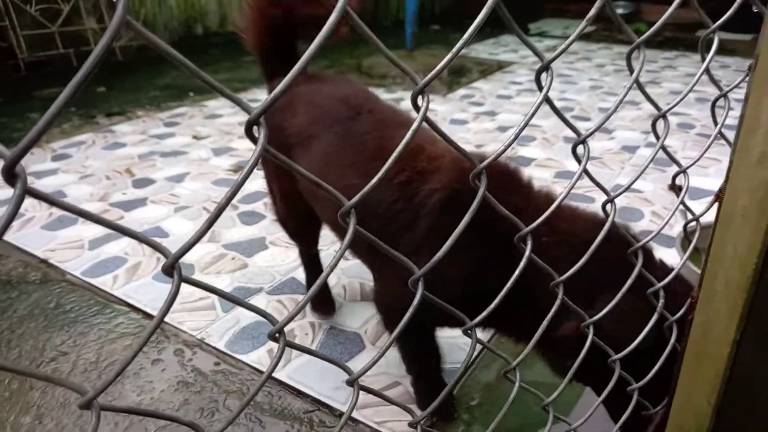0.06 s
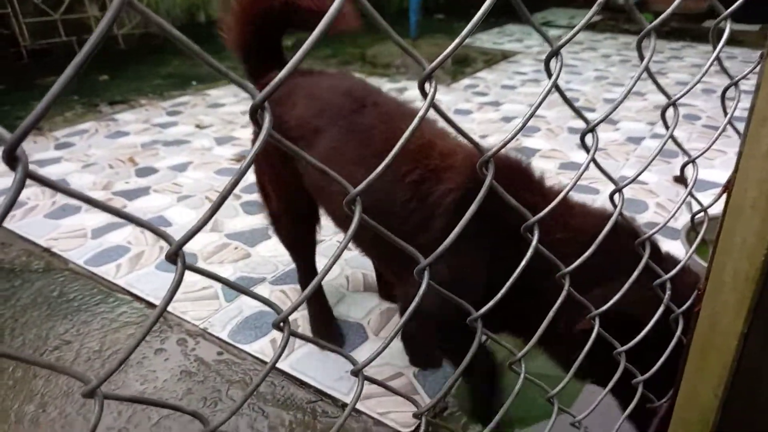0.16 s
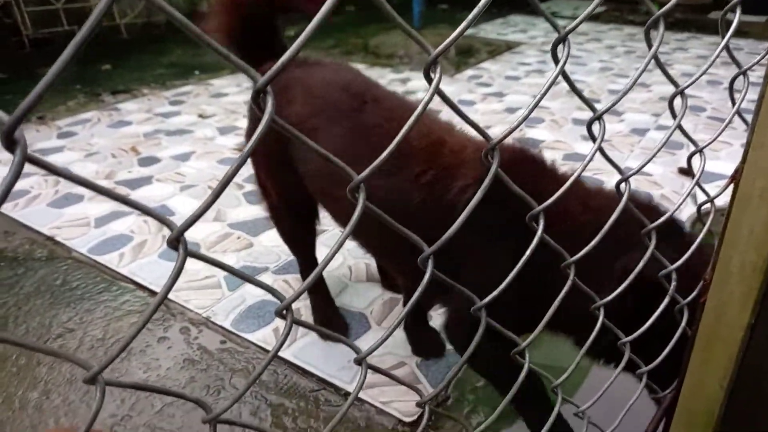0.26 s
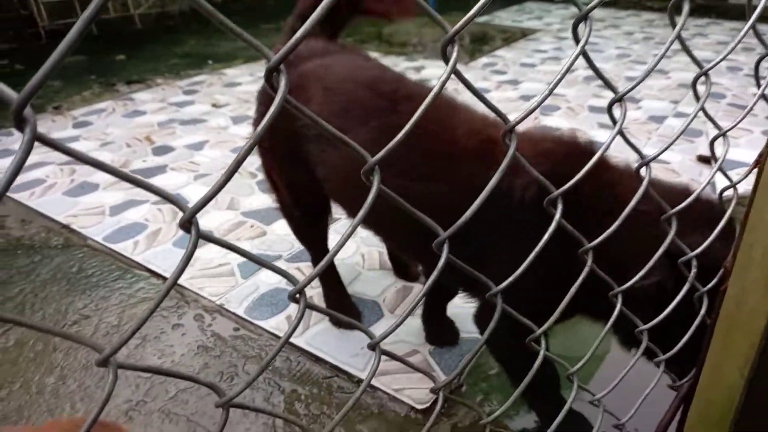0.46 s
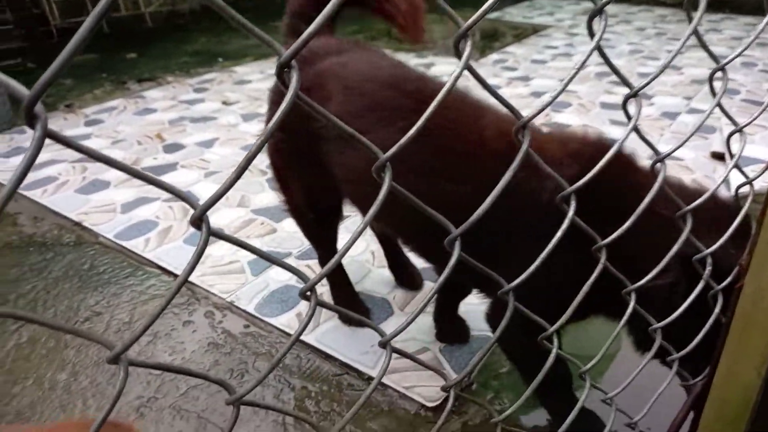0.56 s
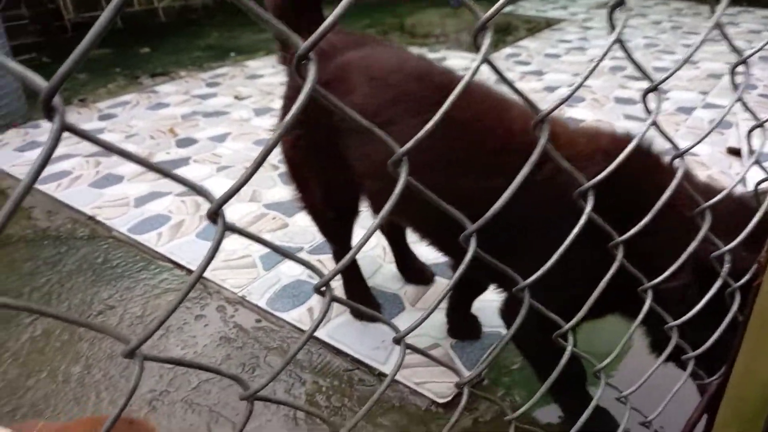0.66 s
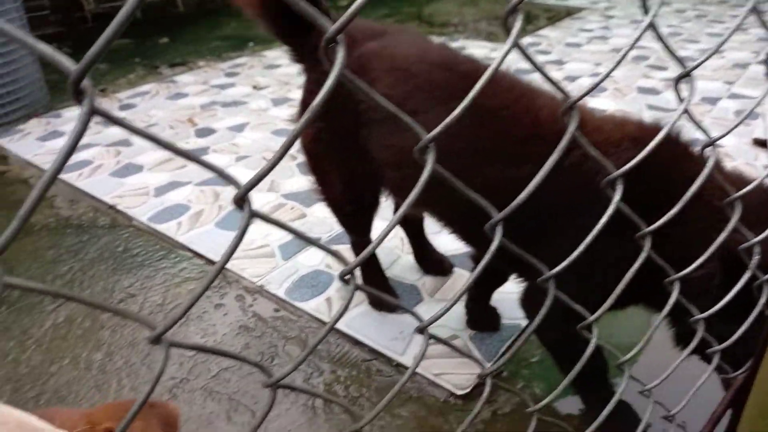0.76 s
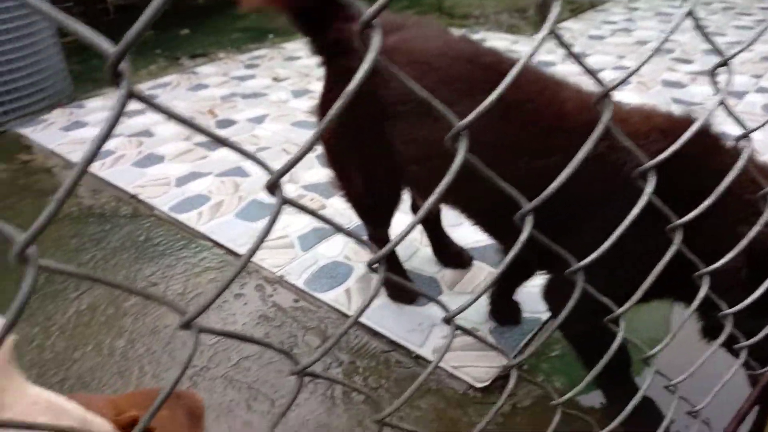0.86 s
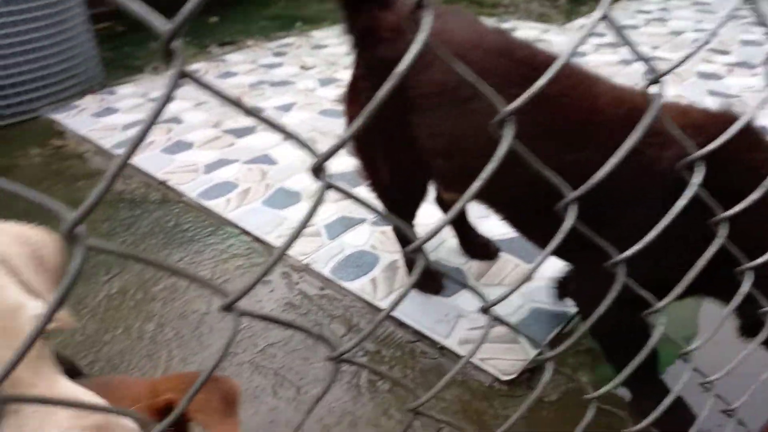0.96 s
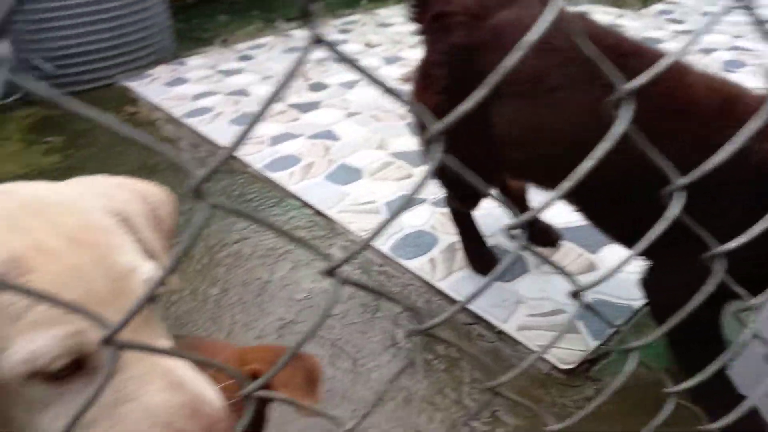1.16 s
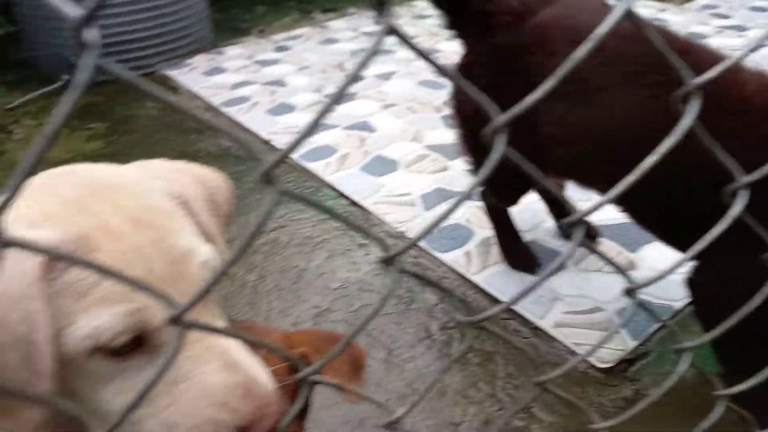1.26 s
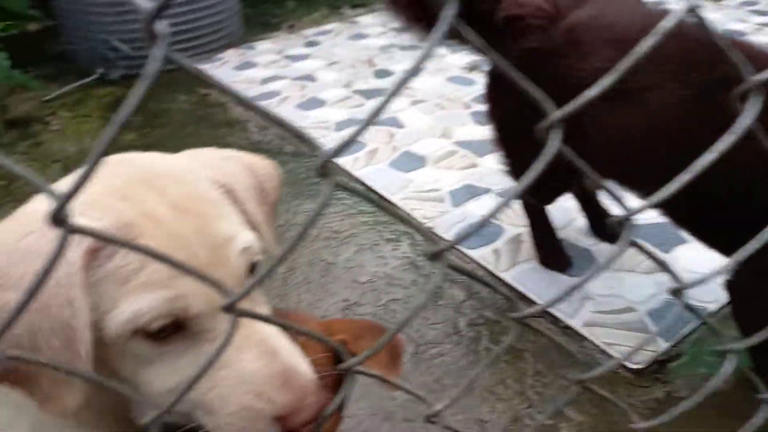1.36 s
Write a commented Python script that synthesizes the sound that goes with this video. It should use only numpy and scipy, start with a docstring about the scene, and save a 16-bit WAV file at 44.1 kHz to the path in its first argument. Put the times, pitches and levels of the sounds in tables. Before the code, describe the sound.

Dogs yelp, whine and give one hoarse bark in an echoing pen.

```python
"""Excited dogs in a hard-walled pen; each call is vocal-fold pulses and breath shaped by a throat.
A distant yelp dies away under a thin nasal whistle. At 0.2 s one dog yelps close by; a second answers
from farther back, ringing in the pen. Near 0.8 s a hoarse bark follows and sinks into a low groan.
More whines, soft grunts, thuds and scuffs come in between, over a faint rumble and outdoor air."""
import sys
import numpy as np
from scipy import signal
from scipy.fft import rfft, irfft, next_fast_len
from scipy.io import wavfile
from scipy.ndimage import uniform_filter1d, map_coordinates

SR = 44100
rng = np.random.default_rng(int(sys.argv[2]) if len(sys.argv) > 2 else 0)


def master_out(mix):
    """Clip the mix to full scale and print it as 16-bit PCM to the path in sys.argv[1]."""
    frames = np.transpose(np.atleast_2d(mix))
    ceiling = np.clip(frames, -1, 1)
    pcm = np.round(ceiling * 32767).astype(np.int16)
    wavfile.write(sys.argv[1], SR, pcm)


N = 61739
LEAD = SR // 5  # samples before time zero
T = np.arange(-LEAD, N) / SR
N_FFT = next_fast_len(len(T) + SR // 2, real=True)
HZ = np.fft.rfftfreq(N_FFT, 1 / SR)
TOP_HZ = 15800

# Near yelp. Each row: time in seconds, pitch in Hz, body level in dB, treble level in dB.
NEAR_YELP = [(.207, 402.4, -18.5, -30), (.212, 417, -17.5, -22), (.221, 452.3, -14.5, -17),
             (.231, 494, -14.5, -16), (.241, 522.7, -15.5, -10), (.252, 541.8, -17.5, -14.5),
             (.265, 541.7, -17, -15.5), (.275, 535.4, -17, -16), (.281, 530, -26, -29),
             (.291, 486, -27.5, -50)]
# Its direction. Each row: frequency in Hz, lag of left behind right in radians.
NEAR_LAG_RAD = [(20, 0), (300, .5), (550, .9), (1100, 1.55), (1650, 1.7), (2700, 1.7), (3300, 2.2),
                (3800, 4), (5000, 5.3), (8000, 10), (15000, 22)]
# Each row: frequency in Hz, leftward pan in dB.
NEAR_PAN_DB = [(300, -1.8), (1000, -1.3), (2800, -1.1), (4000, .3), (8000, .5)]
# Far calls. Each row: time in seconds, pitch in Hz, source level in dB, roughness from 0 to 1.
OPENING_CALL = [(-.12, 586, -21, 0.74), (-.04, 611, -41, 0.65), (.01, 606, -52.5, 0.77),
                (.06, 605, -49.5, 1), (.08, 570, -53.5, 0.36)]
ANSWER_CALL = [(.288, 486, -30.5, 0.69), (.315, 566.5, -28.5, 0.74), (.338, 610.3, -22, 0.44),
               (.35, 615.2, -25.5, 0.24), (.372, 630.7, -21, 0.17), (.381, 624.6, -35, 0.36),
               (.399, 637.2, -24.5, 0.26), (.409, 621, -36.5, 1), (.43, 619.3, -25, 0.97)]
BARK_CALL = [(.764, 261.9, -50, 1), (.789, 272.8, -28.5, 0.47), (.81, 290.8, -26.5, 0.43),
             (.824, 301.4, -28.5, 0.2), (.836, 311.2, -20.5, 0.45), (.85, 303.3, -32, 0.5),
             (.872, 265, -39.5, 0.13), (.93, 228.2, -51, 0.72), (.98, 207, -66, 0.24)]
GROAN_CALL = [(.835, 236.2, -52.5, 0.35), (.86, 234.6, -37.5, 0.092), (.895, 222.9, -36, 0.2),
              (.925, 223.7, -36, 0.45), (.97, 200.8, -44.5, .35), (1.04, 180.1, -52, 0.56),
              (1.12, 182.7, -51.5, .4), (1.155, 169.6, -72, 0.34), (1.19, 175.4, -63.5, 0.3),
              (1.22, 165, -72.5, 0.67), (1.27, 163, -79.5, 0.49)]
# Throat resonances. Each row: frequency in Hz, relative gain in dB.
NEAR_THROAT_DB = [(60, -59.5), (200, -45.5), (400, -11.5), (560, -21), (800, -5), (1090, -4), (1300, 8.5),
                  (1650, -7.5), (2150, -6), (2700, 1.5), (3250, -4.5), (3800, -1.5), (4400, -20.5),
                  (4900, -27.5), (5400, -33), (6100, -34.5), (7400, -20.5), (8500, -48), (11000, -37.5),
                  (15000, -51)]
OPENING_THROAT_DB = [(250, -26.5), (480, -10.5), (615, -1.5), (740, -10.5), (950, 5), (1230, -7.5),
                     (1500, 0), (1860, 0), (2300, -7), (3000, -15.5), (3500, -14), (4000, -23.5),
                     (4400, -21), (4900, -22.5), (7000, -27), (8500, -43.5), (15000, -46.5)]
ANSWER_THROAT_DB = [(250, -32), (480, -4.5), (630, -9.5), (850, -5.5), (1150, 2.5), (1500, -13),
                    (1880, 5.5), (2300, -7.5), (3000, -12.5), (3800, -19.5), (4400, -27), (7000, -30),
                    (8500, -36.5), (11500, -33.5), (15000, -51)]
BARK_THROAT_DB = [(60, -47), (150, -39), (300, -32), (420, -18), (520, -7.5), (690, 4), (780, 4), (900, 2),
                  (1020, 7.5), (1170, 2), (1470, -1.5), (1680, 0.5), (1870, 6.5), (2220, -6.5), (2600, -4),
                  (3000, -12.5), (3800, -19), (4600, -36), (7000, -34.5), (8500, -42), (11500, -36.5),
                  (15000, -53.5)]
GROAN_THROAT_DB = [(80, -30), (180, -12), (250, -18.5), (370, 8), (460, 0), (690, 10.5), (900, -1),
                   (1300, -4.5), (2000, -20), (2800, -12), (4000, -34), (7000, -25), (14000, -40.5)]
GRUNT_THROAT_DB = [(80, -9), (170, -1.5), (260, -15.5), (370, -5.5), (700, -21), (3000, -50.5)]
# Whines, one list each. Each row: time in seconds, pitch in Hz, source level in dB.
WHINE_CALLS = [
    [(-.02, 6310, -63), (.02, 6192, -45.5), (.07, 6196, -47.5), (.115, 6210, -47), (.145, 6190, -53),
     (.17, 6185, -44), (.21, 6140, -52), (.24, 6190, -45)],
    [(.045, 5270, -62), (.06, 5250, -61), (.075, 5200, -74)],
    [(.648, 6620, -86), (.67, 6650, -51.5), (.695, 6630, -51.5), (.712, 6270, -57), (.73, 5720, -59),
     (.745, 5810, -61)],
    [(1.04, 6750, -71), (1.06, 6483, -60.5), (1.08, 6080, -74), (1.125, 5575, -67), (1.145, 5340, -89)],
]
# One row per whine: pitch waver as a fraction, reverb gain in dB (capped in whine).
WHINE_WAVER_WET = [(.0012, -9), (.008, -6), (.008, 2), (.009, -3)]
# Grunts. Each row: centre in seconds, pitch in Hz, peak source level in dB.
GRUNT_EVENTS = [(0.412, 171.9, -44.5), (1.045, 180.2, -52), (1.118, 171.1, -53.5), (1.184, 167.3, -53.5)]
# Pen reverberation. Each row: frequency in Hz, time to decay 60 dB in seconds.
PEN_T60_S = [(100, .5), (500, 0.66), (1400, 0.72), (1900, 0.71), (2300, .75), (2700, 0.75), (4000, 0.7),
             (8000, 0.7), (14000, .4)]
# Thuds. Each row: centre in seconds, frequency in Hz, peak level in dB.
THUD_EVENTS = [(0.156, 69.05, -51.5), (1.126, 82.9, -53)]
# Scuffs. Each row: centre in seconds, peak level in dB.
SCUFF_EVENTS = [(0.589, -70.5), (1.235, -66)]
# Noise spectra. Each row: frequency in Hz, relative gain in dB.
SCUFF_SPECTRUM_DB = [(500, -20), (2500, -7), (6500, -1), (9000, -8), (14000, -19)]
RUMBLE_SPECTRUM_DB = [(20, -21.5), (40, -23), (65, -6.5), (90, -2), (130, -5.5), (250, -14), (600, -18),
                      (2000, -49)]
AIR_SPECTRUM_DB = [(100, -30), (500, -6.5), (1500, 8), (3000, -11), (6500, -4.5), (8500, -15.5),
                   (15000, -28.5)]
# Background. Each row: time in seconds, rumble level in dB, air level in dB.
BACKGROUND_DB = [(0, -57.5, -92), (.15, -64.5, -53), (.3, -56, -69), (.7, -62, -58), (.95, -62.5, -51),
                 (1.2, -56.5, -66.5), (1.28, -69.5, -69), (1.4, -72.5, -88)]


def near_yelp(rough, onset_rough, jitter, wet_db, treble_hz=2052, spread_s=.00078, wall_s=.025):
    """Yelp from the right: starts hoarse, clears, arches in pitch, brightens as the mouth opens."""
    gate, pitch_hz, body_db, treble_db = curves(NEAR_YELP)
    hoarse = np.interp(T, [.23, .245], [onset_rough, rough])
    source = vocal_folds(pitch_hz, hoarse, jitter, hiss_hz=8500) + rasp()
    voice = throat(source, NEAR_THROAT_DB)
    body = filtered(voice, 1 / (1 + (HZ / treble_hz) ** 12))
    yelp = gate * (amp(body_db) * levelled(body) + amp(treble_db) * levelled(voice - body))
    # each pulse's treble trails its bass
    yelp = filtered(yelp, np.exp(-1j * np.pi * HZ * spread_s * np.minimum(HZ / treble_hz, 2)))
    direct = place(yelp, along(NEAR_LAG_RAD, HZ), along(NEAR_PAN_DB, HZ))
    delayed = filtered(yelp, np.exp(-2j * np.pi * HZ * wall_s))
    return direct + amp(wet_db) * pen(delayed, pan_db=.5)


def rasp(corner_hz=6000, gain=3.1):
    """Treble turbulence, strongest while the mouth opens."""
    hiss = filtered(rng.standard_normal(len(T)), 1 - 1 / (1 + (HZ / corner_hz) ** 2))
    return gain * np.interp(T, [.228, .25], [1, .2]) * hiss


def vocal_folds(pitch_hz, rough, jitter, hiss_hz):
    """Unsteady pulses plus turbulence let through once a cycle, which takes over above hiss_hz."""
    hz = pitch_hz * (1 + jitter * wobble(220))
    phase = 2 * np.pi * np.cumsum(hz) / SR
    harmonics = np.arange(TOP_HZ // np.min(pitch_hz) + 1)
    pulses = unit(sum(np.cos(k * phase) * (k * hz < TOP_HZ) for k in harmonics))
    puffs = unit(rng.standard_normal(len(T)) * (.72 + np.cos(phase)))
    lowpass = 1 / np.sqrt(1 + (HZ / hiss_hz) ** 4)
    clear = filtered(pulses, lowpass) + filtered(puffs, 1 - lowpass)
    return np.sqrt(1 - rough) * clear + np.sqrt(rough) * puffs


def throat(source, throat_db):
    """Throat resonances as a minimum-phase filter."""
    cepstrum = irfft(np.log(amp(along(throat_db, HZ))), N_FFT)
    cepstrum[1:N_FFT // 2] *= 2
    cepstrum[N_FFT // 2 + 1:] = 0
    return filtered(source, np.exp(rfft(cepstrum, N_FFT)))


def far_call(rows, throat_db, jitter, direct_db, wet_db, pan_db):
    """Call from the back of the pen, heard directly and off the walls."""
    gate, pitch_hz, level_db, rough = curves(rows)
    source = vocal_folds(pitch_hz, rough, jitter, hiss_hz=3830)
    call = gate * amp(level_db) * unit(throat(source, throat_db))
    return amp(direct_db) * place(call, 0, pan_db) + amp(wet_db) * pen(call, pan_db)


def whine(rows, waver, wet_db):
    """Nearly pure whistle through the nose."""
    gate, pitch_hz, level_db = curves(rows)
    envelope = gate * amp(level_db + .4 * wobble(66))
    hz = pitch_hz * (1 + waver * wobble(140))
    whistle = envelope * np.sqrt(2) * np.sin(2 * np.pi * np.cumsum(hz) / SR)
    return place(whistle, 0, pan_db=1.5) + amp(min(wet_db, -3)) * pen(whistle, pan_db=2)


def grunts(rough, half_s=.024, sag=.057, fade_db=17):
    """Short, soft calls that sink in pitch."""
    mix = 0
    for centre_s, hz, db in GRUNT_EVENTS:
        rows = [(centre_s + k * half_s, hz * (1 - k * sag), db - abs(k) * fade_db, rough)
                for k in (-1, 0, 1)]
        mix += far_call(rows, GRUNT_THROAT_DB, jitter=.013, direct_db=4, wet_db=-14.5, pan_db=-1)
    return mix


def pen(x, pan_db):
    """Hard-wall reverberation: strong early reflections, then a decaying tail, different per side."""
    hz, t, noise = signal.stft(rng.standard_normal((2, SR)), SR, nperseg=256)
    decay = amp(-60 * t / along(PEN_T60_S, hz)[:, None])
    early = 1 + 2.9 * np.exp(-t / .045)
    tail = signal.istft(noise * early * decay, SR, nperseg=256)[1]
    tail = np.pad(tail / np.linalg.norm(tail[0]), ((0, 0), (SR // 250, 0)))  # 4 ms pre-delay
    return signal.fftconvolve(x[None], tail, axes=1)[:, :len(T)] * amp([[pan_db], [-pan_db]])


def thuds(half_s=.025):
    """Dull low swells, centred."""
    return sum(amp(db) * np.exp(-((T - s) / half_s) ** 2) * np.sin(2 * np.pi * hz * (T - s))
               for s, hz, db in THUD_EVENTS)


def scuffs(half_s=.03):
    """Faint swells of gritty hiss, like paws on paving."""
    envelope = sum(amp(db) * np.exp(-((T - s) / half_s) ** 2) for s, db in SCUFF_EVENTS)
    grit = rng.standard_normal((2, len(T))) * amp(2 * wobble(300))
    return envelope * coloured(grit, SCUFF_SPECTRUM_DB)


def background():
    """Low rumble, mostly common to both sides, and a thin wash of outdoor air."""
    _, rumble_db, air_db = curves(BACKGROUND_DB)
    common = rng.standard_normal(len(T))
    rumble = coloured(common + .51 * rng.standard_normal((2, len(T))), RUMBLE_SPECTRUM_DB)
    air = coloured(rng.standard_normal((2, len(T))), AIR_SPECTRUM_DB)
    rumble *= amp(rumble_db + 4.7 * wobble(16)) * amp([[-1], [1]])
    return rumble + amp(air_db + 1.3 * wobble(27)) * air


def place(x, lag_rad, pan_db):
    """Direct sound in stereo: left lags by lag_rad; pan_db is added left, taken off right."""
    side = np.array([[1], [-1]])
    return filtered(x, amp(side * pan_db) * np.exp(-.5j * lag_rad * side))


def curves(rows, edge_s=.004):
    """Gate over the rows' time span, then each further column per sample."""
    times_s, *columns = np.transpose(rows)
    gate = np.clip(np.minimum(T - times_s[0], times_s[-1] - T) / edge_s + .5, 0, 1)
    return [gate] + [np.interp(T, times_s, column) for column in columns]


def wobble(rate_hz):
    """Smooth random curve with knots at rate_hz."""
    return map_coordinates(rng.standard_normal(4096), [(T - T[0]) * rate_hz], mode="wrap")


def along(points, hz):
    """Interpolate on a log frequency axis."""
    knots_hz, values = np.transpose(points)
    return np.interp(np.log(hz + 1), np.log(knots_hz + 1), values)


def filtered(x, response):
    return irfft(rfft(x, N_FFT) * response, N_FFT)[..., :x.shape[-1]]


def coloured(noise, spectrum_db):
    return unit(filtered(noise, amp(along(spectrum_db, HZ))))


def levelled(x):
    """Hold the running rms at 1."""
    return x / np.sqrt(np.abs(uniform_filter1d(x ** 2, size=500)) + 1e-12)


def unit(x):
    """Scale to rms 1."""
    return x / np.sqrt(np.mean(x ** 2) + 1e-20)


def amp(db):
    return 10 ** (np.asarray(db) / 20)


def scene():
    """Dogs and background in stereo, from time zero."""
    dogs = near_yelp(rough=.0015, onset_rough=.014, jitter=.0047, wet_db=-19)
    dogs += far_call(OPENING_CALL, OPENING_THROAT_DB, jitter=.018, direct_db=-9, wet_db=1, pan_db=0)
    dogs += far_call(ANSWER_CALL, ANSWER_THROAT_DB, jitter=.0044, direct_db=-5, wet_db=-1, pan_db=-.3)
    dogs += far_call(BARK_CALL, BARK_THROAT_DB, jitter=.012, direct_db=-3.5, wet_db=1.5, pan_db=-.5)
    dogs += far_call(GROAN_CALL, GROAN_THROAT_DB, jitter=.036, direct_db=-4.5, wet_db=-4, pan_db=-.45)
    whines = sum(whine(rows, *manner) for rows, manner in zip(WHINE_CALLS, WHINE_WAVER_WET))
    return (dogs + grunts(rough=.16) + whines + scuffs() + thuds() + background())[:, LEAD:]


def record(dry):
    """Brick-wall low-pass at TOP_HZ."""
    return filtered(dry, HZ < TOP_HZ)


dry = scene()
out = record(dry)
master_out(out)
```